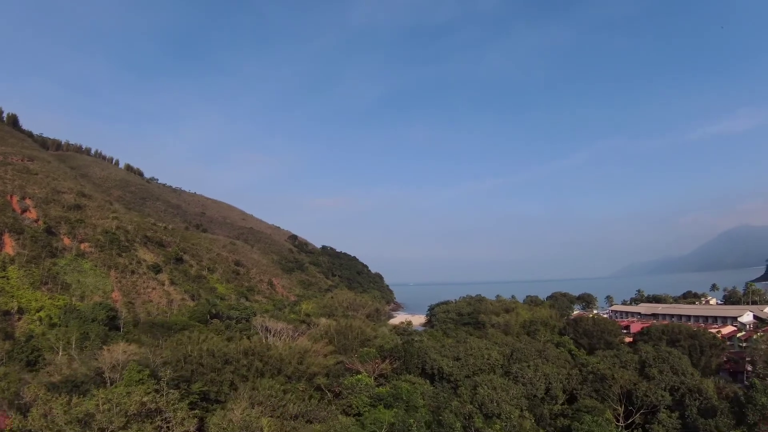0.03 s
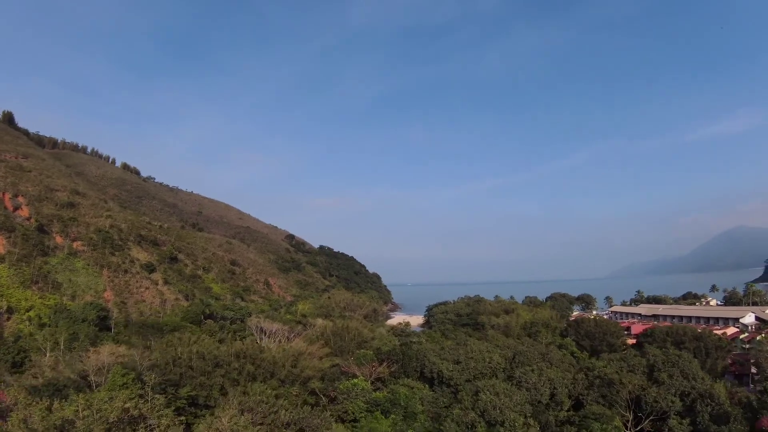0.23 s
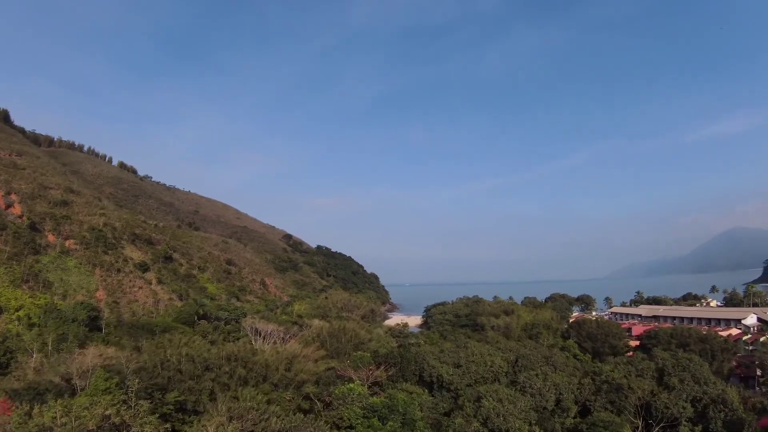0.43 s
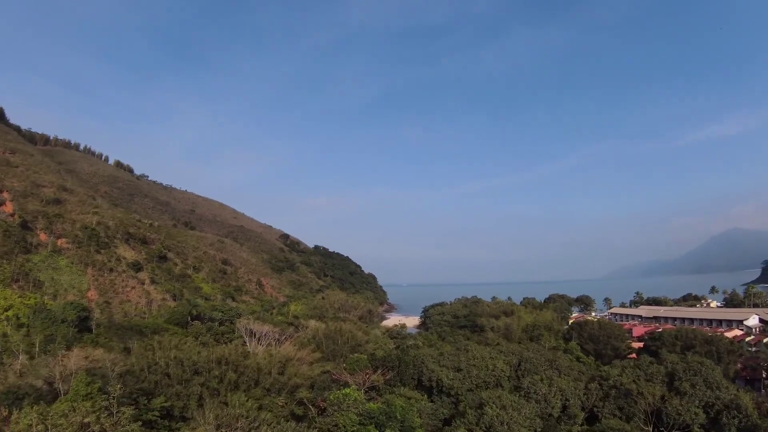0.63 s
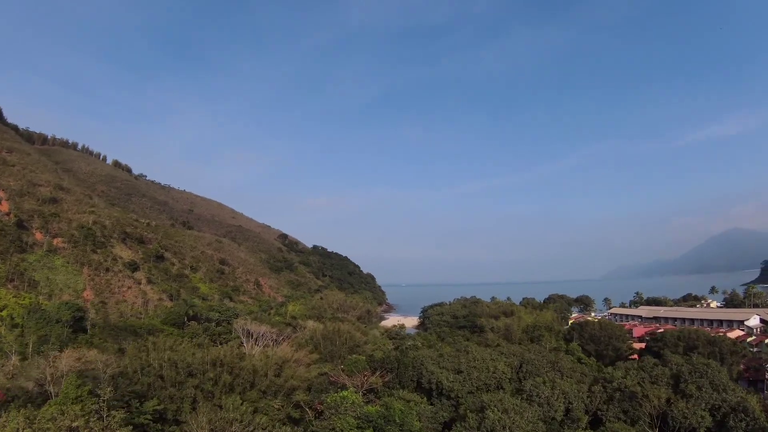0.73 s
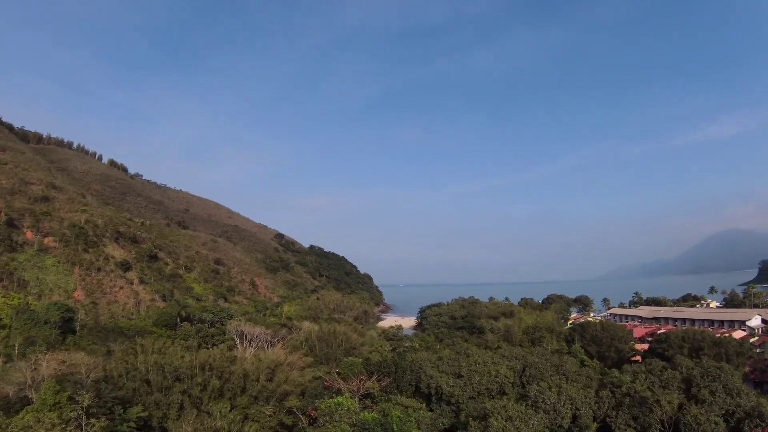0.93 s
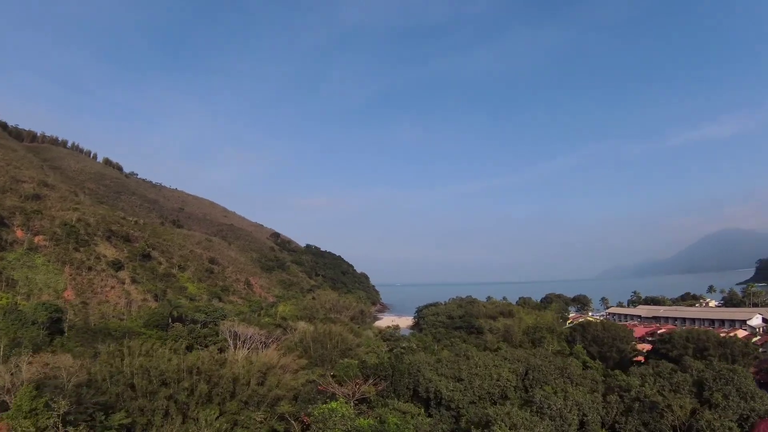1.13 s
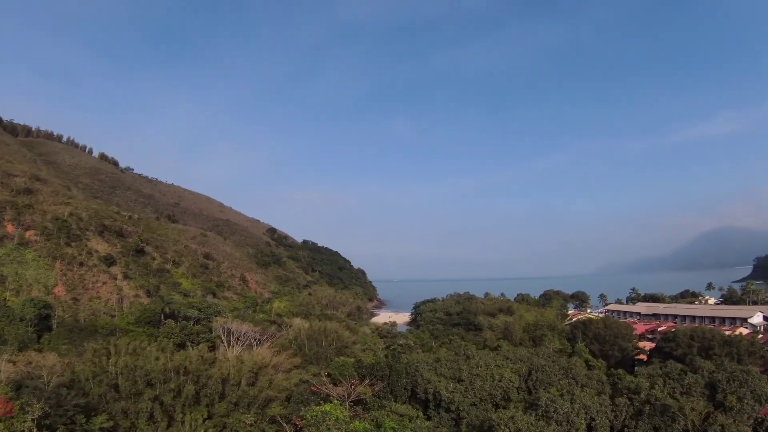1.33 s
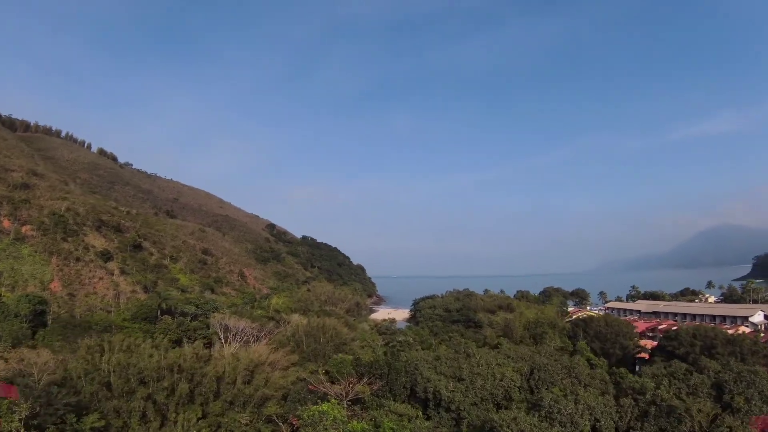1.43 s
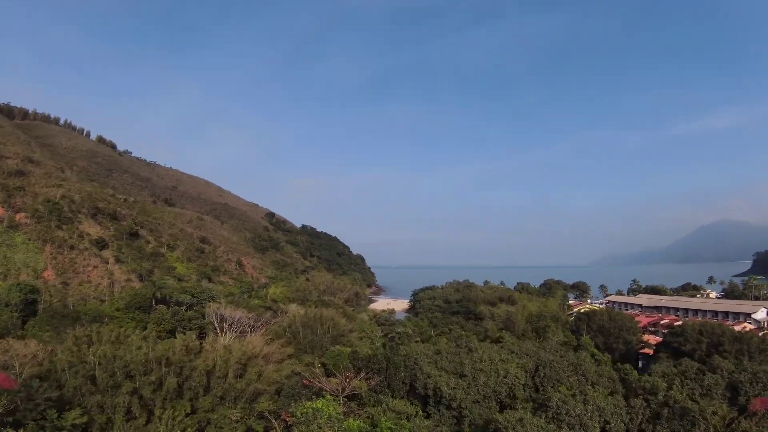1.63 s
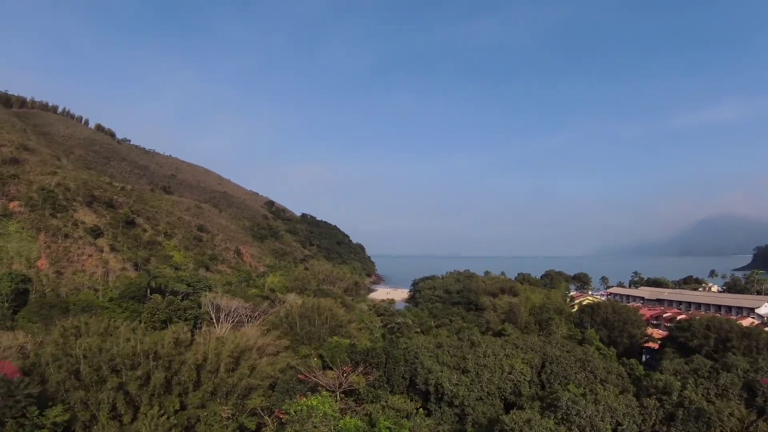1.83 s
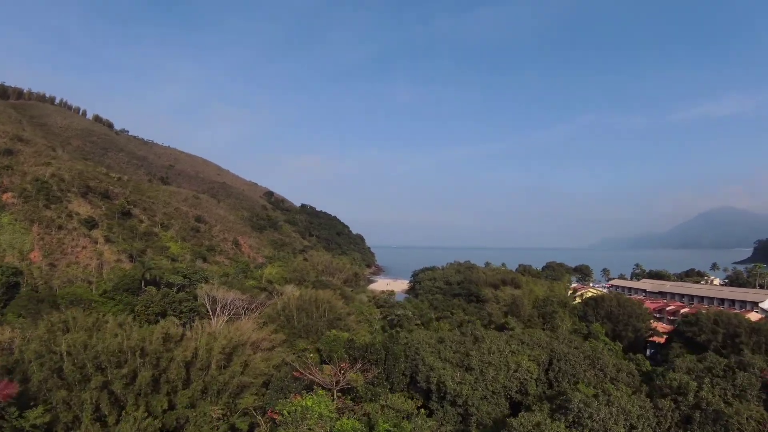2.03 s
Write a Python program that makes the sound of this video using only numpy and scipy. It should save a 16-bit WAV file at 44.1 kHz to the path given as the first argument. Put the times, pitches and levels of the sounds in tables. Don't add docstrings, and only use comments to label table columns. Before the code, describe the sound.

Continuous nasal drone whine outdoors, captured on board: uneven rotor tones drift slightly lower, air hisses and flutters, and the camera mount rings with brief buzzes, strongest at the very end.

```python
import sys
import numpy as np
from scipy import signal
from scipy.fft import rfft, irfft
from scipy.io import wavfile
from scipy.ndimage import uniform_filter1d

SR = 44100
rng = np.random.default_rng(int(sys.argv[2]) if len(sys.argv) > 2 else 0)


def output_pcm(signal):
    pcm = np.clip(np.atleast_2d(signal).T, -1, 1) * 32767
    wavfile.write(sys.argv[1], SR, np.round(pcm).astype(np.int16))


def convert_level_to_amplitude(level_db):
    exponent = np.asarray(level_db, float) / 20
    return 10 ** exponent


N = 92080

# (time [s], slow rotor 1 [Hz], slow rotor 2 [Hz], fast rotor 1 [Hz], fast rotor 2 [Hz])
BLADE_RATES_HZ = [(0.0, 419.0, 418.5, 533.0, 539.0), (0.12, 428.5, 421.0, 536.0, 545.0),
                  (0.25, 423.0, 423.0, 536.0, 543.5), (0.4, 418.0, 418.5, 527.5, 533.0),
                  (0.55, 421.0, 418.0, 528.0, 537.0), (0.62, 413.0, 415.0, 526.5, 535.0),
                  (0.7, 405.5, 406.5, 517.0, 525.5), (0.8, 409.5, 410.0, 522.0, 529.0),
                  (0.9, 415.0, 413.5, 524.5, 534.0), (1.05, 407.5, 407.0, 518.5, 530.5),
                  (1.15, 411.5, 411.0, 515.5, 530.5), (1.3, 409.0, 409.0, 515.0, 530.5),
                  (1.4, 405.0, 408.0, 515.5, 527.0), (1.55, 394.5, 407.0, 507.5, 516.0),
                  (1.7, 396.5, 408.0, 504.5, 517.5), (1.8, 386.0, 412.0, 509.0, 516.0),
                  (1.95, 387.5, 419.0, 509.5, 522.5), (2.09, 391.0, 418.0, 501.5, 520.5)]
SHAFT_ORDERS = (1, 3, 6, 9, 12, 14, 21, 42)
# (level of each shaft order [dB], ..)
ORDER_LEVELS_DB = [
    (-73, -43.5, -46, -47.5, -60, -58.5, -72, -58.5),
    (-65, -53.5, -57, -53.5, -71, -50, -60, -39),
    (-76.5, -56, -51, -68, -71.5, -52.5, -66.5, -43.5),
    (-71, -53.5, -50.5, -72.5, -71, -52.5, -68, -64),
]
# (left minus right of each shaft order [dB], ..)
ORDER_PANS_DB = [(1.1, -2, -0.7, -2, 2.6, 0.5, -2, .1), (1.1, 7.5, -7, -4, 1.5, 5, -2.5, 0.12),
                 (1.1, 13.5, -4, -2, 3.5, 1.5, 3, .1), (1.1, -8, 6, 2, 2.4, -15, -11, .1)]
# (lag [ms], ..)
PORT_LAGS_MS = (0., 0.23, -.05, -0.12)
# (frequency [Hz], density [dB per Hz])
WASH_COMMON_DB = [(25, -75.5), (50, -70.5), (130, -71.5), (330, -77.5), (680, -83), (800, -74),
                  (1700, -79.5), (8500, -83.5)]
# (frequency [Hz], density [dB per Hz])
WASH_OPPOSED_DB = [(25, -101), (130, -81.5), (400, -86), (750, -95), (1300, -86), (2000, -77.5),
                   (2600, -78), (5000, -85.5)]
# (frequency [Hz], gain [dB])
CAMERA_RESPONSE_DB = [(2530, 0.29), (2600, -6.5), (3500, -14), (4050, -34.5), (4250, -64.5), (5000, -48),
                      (7000, -37.5), (9000, -56)]
MIX_ORDERS = ((-3, 3), (3, 3), (6, 3), (3, 6), (-3, 14), (9, 6), (6, 12))
# (level [dB], ..)
MIX_LEVELS_DB = (-66, -54.5, -63, -59, -62, -62.5, -58.5)
# (left minus right [dB], ..)
MIX_PANS_DB = (3.2, 2.6, 4.5, 1, -2.7, -7, -1)
# (level [dB], ..)
MIX_DRIVES_DB = (-2.44, -0.5, -5.14, 3.5)
# (frequency [Hz], width [Hz], level [dB], left minus right [dB], share unlike in the ports [1])
MOUNT_MODES = [
    (1507, 35, -56.5, 7, 1),
    (3013, 65, -55.5, -10, 0.98),
]
# (time [s], rise [dB], half length [s])
MOUNT_BUZZES = [
    (0.599, 7, 0.03),
    (1.441, 5, .04),
    (1.714, 9, 0.04),
    (1.989, 16, 0.062),
]

BLADES = 3
AIRBORNE_ORDER = 12
HALF = np.array([[0.5], [-0.5]])
GUST_JITTER, GUST_JITTER_RATE_HZ = 0.0022, 22.0
HUNT, HUNT_RATE_HZ = 0.0075, 85.0
FLUTTER_DB, FLUTTER_RATE_HZ = 1.0, 35.0
PHASE_SPREAD_TURNS = 0.35
GUST_DB, GUST_RATE_HZ = 0.5, 2.2
FLICKER_DB, FLICKER_RATE_HZ = 0.78, 15.0
CHOP_DEPTH = 0.56
SQUARE_GAIN, CEILING = 4.0, 0.075
FRAME_HZ, FRAME_WIDTH_HZ, FRAME_GAIN = 865, 22, 0.51
NOTCH_HZ, NOTCH_SPACING_HZ, RIPPLE_FROM_HZ = 6070.0, 1400.0, 4400.0
HISS_DB, HISS_APART = -99, 0.79


def on_log_hz(points, hz):
    p = np.array(points, float)
    return np.interp(np.log(hz + 1), np.log(p[:, 0]), p[:, 1])


def walk(rate_hz):
    hold = int(SR / rate_hz)
    steps = np.repeat(rng.standard_normal(N // hold + 1), hold)[:N]
    slewed = uniform_filter1d(uniform_filter1d(steps, hold), hold)
    return slewed / np.std(slewed)


def shaft(blade_hz, lag_ms):
    wander = GUST_JITTER * walk(GUST_JITTER_RATE_HZ) + HUNT * walk(HUNT_RATE_HZ)
    shaft_hz = blade_hz / BLADES * (1 + wander)
    angle = 2 * np.pi * (np.cumsum(shaft_hz) / SR + rng.random())
    lag_angle = 2 * np.pi * shaft_hz * HALF * lag_ms / 1000
    return angle, lag_angle


def tone(angle, level_db, pan_db):
    size = np.sqrt(2) * convert_level_to_amplitude(level_db + FLUTTER_DB * walk(FLUTTER_RATE_HZ) + HALF * pan_db)
    return -size * np.cos(angle + 2 * np.pi * PHASE_SPREAD_TURNS * rng.standard_normal())


def rotor(turn, levels_db, pans_db):
    angle, lag_angle = turn
    out = 0
    for order, level_db, pan_db in zip(SHAFT_ORDERS, levels_db, pans_db):
        airborne = order >= AIRBORNE_ORDER
        out = out + tone(order * (angle - airborne * lag_angle), level_db, pan_db)
    return out


def mixing(angles):
    out = 0
    for (slow_order, fast_order), level_db, pan_db in zip(MIX_ORDERS, MIX_LEVELS_DB, MIX_PANS_DB):
        for slow in (0, 1):
            for fast in (2, 3):
                angle = slow_order * angles[slow] + fast_order * angles[fast]
                drive_db = MIX_DRIVES_DB[slow] + MIX_DRIVES_DB[fast]
                out = out + tone(angle, level_db + drive_db, pan_db)
    return out


def mount():
    t, hz = np.arange(N) / SR, np.arange(N // 2 + 1) * SR / N
    buzz_db = sum(rise_db * np.exp(-((t - at_s) / half_s) ** 2) for at_s, rise_db, half_s in MOUNT_BUZZES)
    out = 0
    for ring_hz, width_hz, level_db, pan_db, apart in MOUNT_MODES:
        resonance = 1 / (1 + ((hz - ring_hz) / width_hz) ** 2)
        ring = irfft(rfft(rng.standard_normal((2, N))) * resonance, N)
        right = apart * ring[1] + (1 - apart) * ring[0]
        ring = np.array([ring[0], right]) / np.std(ring)
        out = out + ring * convert_level_to_amplitude(level_db + buzz_db + HALF * pan_db)
        buzz_db = 0
    return out


def wash(density_db, chop):
    hz = np.arange(N // 2 + 1) * SR / N
    noise = rfft(rng.standard_normal(N)) * convert_level_to_amplitude(on_log_hz(density_db, hz)) * np.sqrt(SR / 2)
    half_octave = np.log2(hz + 1) * 2
    gust_db = GUST_DB * walk(GUST_RATE_HZ)
    out = 0
    for band in range(8, 29):
        share = np.clip(1 - np.abs(half_octave - band), 0, 1)
        out = out + irfft(noise * share, N) * convert_level_to_amplitude(gust_db + FLICKER_DB * walk(FLICKER_RATE_HZ))
    return out * (1 + CHOP_DEPTH * chop)


def scene():
    t, rows = np.arange(N) / SR, np.array(BLADE_RATES_HZ)
    turns = [shaft(np.interp(t, rows[:, 0], rows[:, k + 1]), PORT_LAGS_MS[k]) for k in range(4)]
    angles = [angle for angle, _ in turns]
    rotors = sum(map(rotor, turns, ORDER_LEVELS_DB, ORDER_PANS_DB))
    out = rotors + mixing(angles) + mount()
    chop = sum(np.cos(BLADES * angle) for angle in angles) / 2
    return out + wash(WASH_COMMON_DB, chop) + 2 * HALF * wash(WASH_OPPOSED_DB, chop)


def low_pass(x):
    return signal.sosfilt(signal.butter(12, 15700, fs=SR, output="sos"), x)


def record(dry):
    lopsided = dry - SQUARE_GAIN * (dry ** 2 - np.mean(dry ** 2))
    bent = CEILING * np.tanh(lopsided / CEILING)
    hz = np.arange(N // 2 + 1) * SR / N
    ripple = np.where(hz > RIPPLE_FROM_HZ, np.sin(np.pi * (hz - NOTCH_HZ) / NOTCH_SPACING_HZ), 1)
    frame_peak = 1 + FRAME_GAIN / (1 + ((hz - FRAME_HZ) / FRAME_WIDTH_HZ) ** 2)
    response = frame_peak * convert_level_to_amplitude(on_log_hz(CAMERA_RESPONSE_DB, hz)) * ripple
    cut = irfft(rfft(bent, N) * response, N)
    hiss = convert_level_to_amplitude(HISS_DB) * (rng.standard_normal(N) + HISS_APART * rng.standard_normal(dry.shape))
    return low_pass(cut + hiss)


dry = scene()
out = record(dry)
output_pcm(out)
```